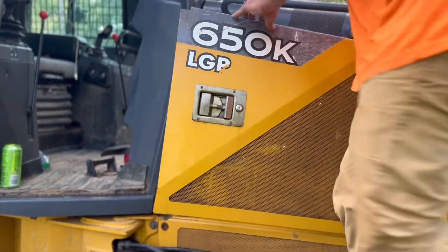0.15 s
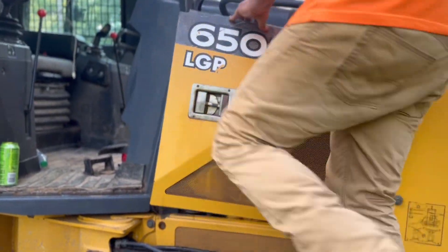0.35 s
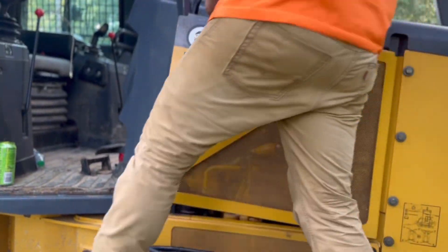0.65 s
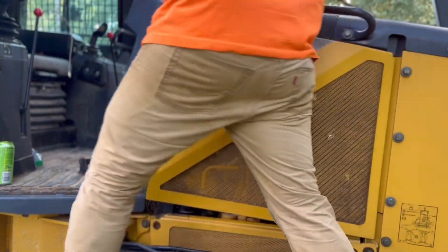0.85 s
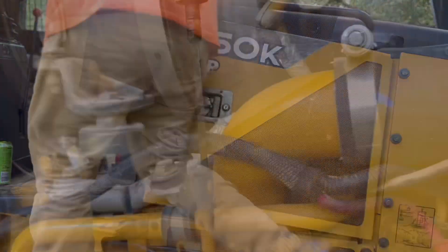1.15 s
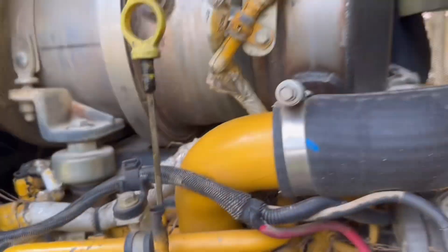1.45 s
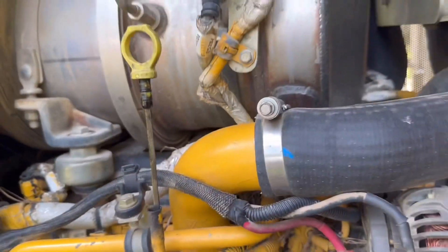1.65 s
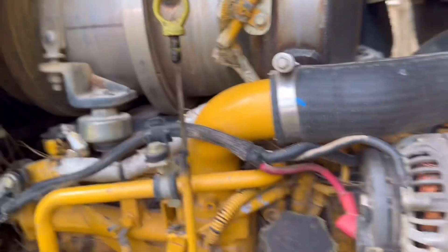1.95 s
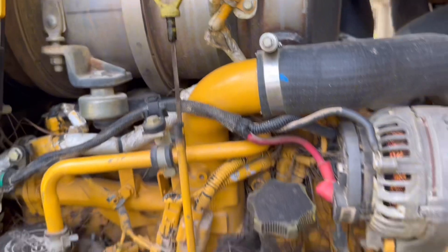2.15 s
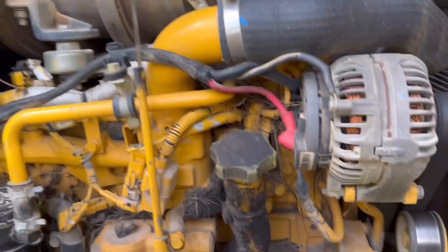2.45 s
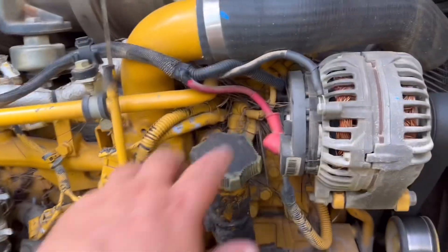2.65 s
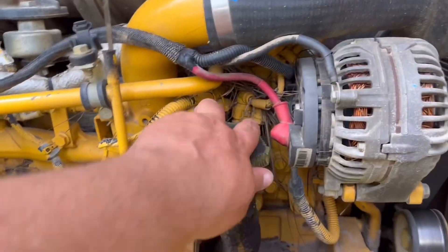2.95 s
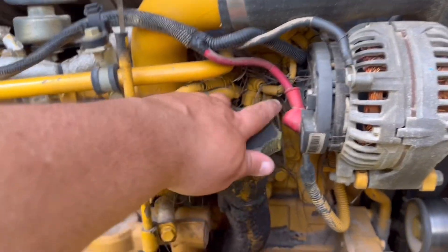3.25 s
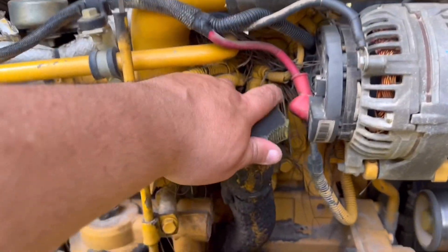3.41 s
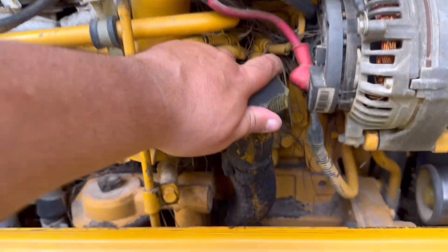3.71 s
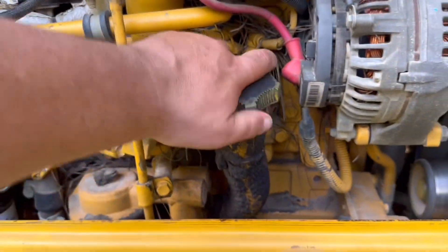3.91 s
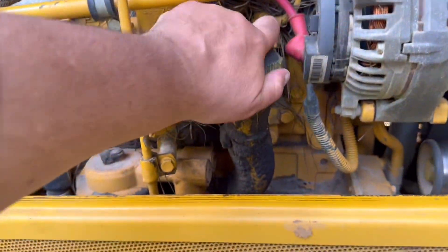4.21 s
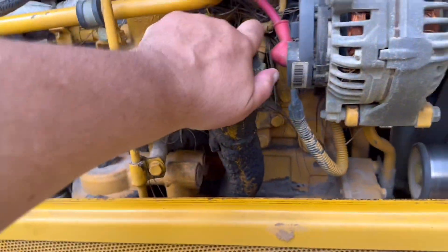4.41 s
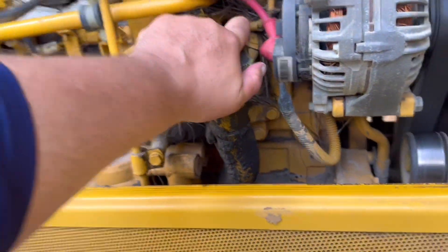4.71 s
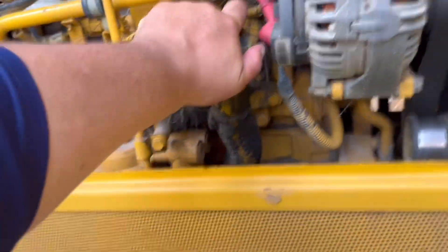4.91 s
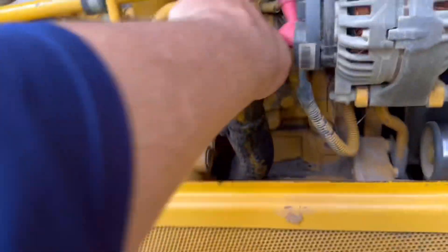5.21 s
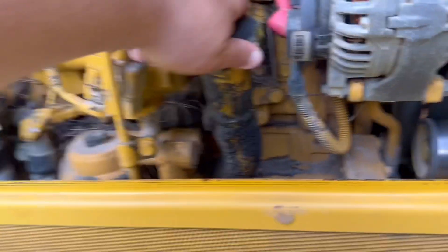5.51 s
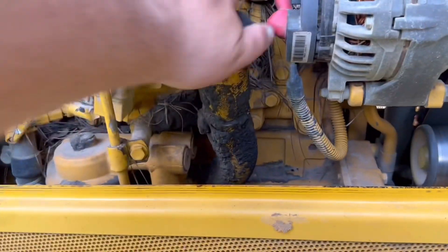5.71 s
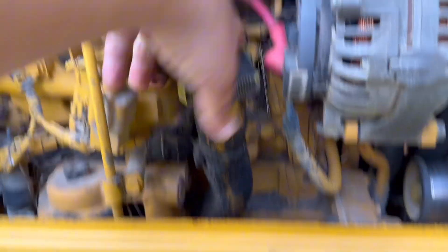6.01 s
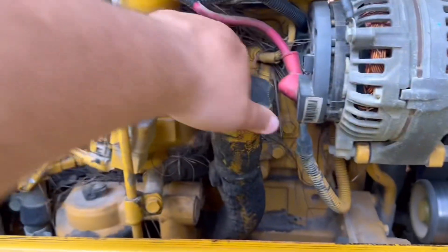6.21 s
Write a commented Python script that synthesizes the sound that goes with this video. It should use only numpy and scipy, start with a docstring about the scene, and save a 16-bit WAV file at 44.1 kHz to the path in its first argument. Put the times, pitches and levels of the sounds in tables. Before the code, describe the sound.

In a quiet outdoor yard with a low rumble and faint distant birds, a boot knocks lightly and then drags over a gritty steel track. After about a second, the sound cuts abruptly to a heavy machine's diesel engine idling right by the microphone. It runs evenly to the end, with a deep throb, rapid knocking and ticking, rushing fan air and a faint whine.

```python
"""A quiet yard with distant birds and a boot scuffing on a steel track; then, at a hard cut, a
four-cylinder diesel idles close by in its open bay. The boot is friction noise with small ringing knocks.
Each firing sends a pressure pulse down the exhaust and excites the modes of the block; blows tied
to the shaft ring the intake and covers, over the hiss of the fan and a faint whine."""
import sys
import numpy as np
from scipy import signal
from scipy.fft import rfft, irfft, next_fast_len
from scipy.io import wavfile
from scipy.ndimage import map_coordinates

SR = 44100
rng = np.random.default_rng(int(sys.argv[2]) if len(sys.argv) > 2 else 0)


def master(y):
    """Save y as 16-bit WAV."""
    cut = np.clip(np.atleast_2d(y).T, -1, 1)
    pcm = np.round(cut * 32767)  # scale
    wavfile.write(sys.argv[1], SR, pcm.astype(np.int16))


N = 280476

FIRING_HZ, CYCLE_START_S, CUT_S = 30.0, .9594, .9662
# the cylinders in firing order: knock_delay_ms, knock_db, injector_tick_db, exhaust_db
CYLINDER_STROKES = [(7, -1.5, -3, 0), (6.5, 0, 0, -.5), (5.5, .5, 3, .5), (6, 1, -.5, 0)]


def amp(db):
    """Amplitude ratio of a level in decibels."""
    return 10 ** (np.asarray(db) / 20)


def unit(x):
    """Normalisation to an rms of 1."""
    return x / np.sqrt(np.mean(x ** 2) + 1e-20)


def along(points, hz):
    """Interpolation of (frequency_hz, value) points on a logarithmic frequency axis."""
    f, v = np.transpose(points)
    return np.interp(np.log(hz + 1), np.log(f + 1), v)


def curves(rows):
    """Piecewise linear envelopes, one for each column after time_s."""
    s, *cols = np.transpose(rows)
    return [np.interp(np.arange(N) / SR, s, c) for c in cols]


def wobble(rate):
    """Smooth random modulation: a spline through rate knots a second."""
    return map_coordinates(rng.standard_normal(int(N * rate / SR) + 4), [np.arange(N) * rate / SR])


def filtered(x, response):
    """Linear filtering: the spectrum of x times a complex frequency response."""
    m = 2 * next_fast_len(N // 2 + SR // 4)
    return irfft(rfft(x, m) * response(np.fft.rfftfreq(m, 1 / SR)), m)[..., :N]


def causal(gain):
    """The minimum-phase response with this gain, by folding the cepstrum."""
    cepstrum = irfft(np.log(gain + 1e-6))
    cepstrum[1:len(gain) - 1] *= 2
    cepstrum[len(gain):] = 0
    return np.exp(rfft(cepstrum))


def stereo(pair, spectrum=((100, 0),)):
    """Partial coherence: two signals, coloured and mixed as mid and side into left and right."""
    # likeness of left and right: frequency_hz, correlation
    coherence = [(100, .995), (350, .95), (700, .78), (1400, .52), (3000, .62), (6000, .6), (8700, .75),
                 (10000, .97), (12000, .98), (14000, .85)]
    angle = lambda hz: np.arccos(np.clip(along(coherence, hz), -1, 1)) / 2
    shares = lambda hz: [np.cos(angle(hz)), np.sin(angle(hz))]
    mid, side = filtered(pair, lambda hz: amp(along(spectrum, hz)) * shares(hz))
    return unit(np.array([mid + side, mid - side]))


def train(seconds, sizes):
    """An impulse train with the given times and sizes."""
    at = np.round(seconds * SR).astype(int)
    return np.bincount(at, sizes, N + SR)[:N]


def yard():
    """Outdoor rumble: low-frequency noise under random amplitude modulation."""
    # rumble spectrum: frequency_hz, density_db
    spectrum = [(15, -43), (25, -8), (65, 0.5), (193, 0), (235, -7.5), (957, -25), (2380, -26),
                (2690, -26.5), (3620, -36), (9000, -46), (11700, -82), (19800, -120)]
    # rumble envelope: time_s, level_db
    envelope = [(0.0, -44.5), (0.072, -47.5), (0.122, -50), (0.146, -48), (0.282, -44), (0.322, -51),
                (0.69, -53.5), (0.7, -58)]
    level_db = curves(envelope)[0] + 2.6 * wobble(11.6)
    return amp(level_db) * stereo(rng.standard_normal((2, N)), spectrum)


def boot():
    """Sliding friction: a sole drags grit over a dull steel track shoe; small knocks ring and decay."""
    # two strokes, a brush and a drag, each with rows of: time_s, thud_db, grit_db
    strokes = [
        [(0, -75, -93), (.03, -53, -58), (.09, -62, -63), (.15, -63, -84)],
        [(.705, -71.5, -72), (.714, -32, -44), (.73, -31.5, -50), (.75, -28, -43), (.772, -30.5, -38.5),
         (.782, -38, -49.5), (.805, -35.5, -46.5), (.84, -43.5, -48), (.85, -49.5, -54), (.9, -50, -61),
         (.92, -51.5, -49), (.96, -53, -48)],
    ]
    # knocks on the steel: start_s, level_db, pitch_hz
    taps = [(0.029, -38.5, 490), (0.129, -36.5, 412), (0.679, -49, 401)]
    thud_db, grit_db = curves(strokes[0] + strokes[1])
    t = np.arange(N) / SR
    grains = rng.standard_normal((2, 2, N)) * amp(2.8 * wobble(150))
    thud = stereo(grains[0], [(120, -15), (300, 0), (480, -5), (900, -4.5), (1500, -14.5),
                              (2800, -22), (4000, -45)])
    grit = stereo(grains[1], [(1200, 4), (2800, -2), (4500, -7), (8000, 0), (11000, -30), (15000, -18)])
    out = amp(thud_db) * thud + amp(grit_db) * grit
    for start_s, level_db, pitch_hz in taps:
        age = np.maximum(t - start_s, 0)
        ring = np.sin(2 * np.pi * pitch_hz * age) * amp(-60 * age / .08)
        crunch = 0.13 * grit * amp(-60 * age / .03)
        out += (t > start_s) * amp(level_db - 3) * (ring + crunch)
    return out


def birds():
    """Distant calls: linear frequency sweeps under fluttering half-sine envelopes."""
    # bird notes: start_s, length_s, start_hz, end_hz, level_db
    notes = [(.145, .03, 3400, 3350, -69), (.2, 0.046, 3300, 3250, -64), (0.256, 0.064, 2890, 2600, -60),
             (0.338, 0.04, 2700, 2670, -63), (.47, .03, 3350, 3350, -68), (0.525, .05, 3350, 3450, -70),
             (0.594, 0.052, 3000, 2730, -61)]
    out, t = np.zeros(N), np.arange(N) / SR
    for start_s, length_s, start_hz, end_hz, level_db in notes:
        progress = np.clip((t - start_s) / length_s, 0, 1)
        phase = 2 * np.pi * length_s * progress * (start_hz + (end_hz - start_hz) * progress / 2)
        out += amp(level_db + 3.7 * wobble(118)) * np.sin(np.pi * progress) * np.sin(phase)
    return out


def firings():
    """The four-stroke cycle: the start time of every power stroke, and its cylinder's columns."""
    k = np.arange(-4, int((N / SR - CYCLE_START_S) * FIRING_HZ) + 1)
    return CYCLE_START_S + k / FIRING_HZ, np.array(CYLINDER_STROKES)[k % 4].T


def exhaust():
    """Periodic pulses make a harmonic series: a deep beat in the pipe, a higher intake gulp just ahead."""
    # harmonics of the firing rate: multiple, level_db
    harmonics = [(1, -60), (2, -12.5), (3, 0.5), (4, -5.5), (5, -8), (6, -15.5), (7, -12.5), (8, -20),
                 (9, -13), (10, -23.5), (11, -29.5), (12, -24.5)]
    start_s, (_, _, _, level_db) = firings()
    scatter = rng.standard_normal((len(start_s), 3))
    start_s = start_s + 0.00022 * scatter[:, 0]
    orders = [(k * FIRING_HZ, db) for k, db in harmonics]
    pipe = [(14, -112)] + orders[:5] + [(200, -37), (1000, -86.5)]
    intake = [(10, -91), (140, -34.5)] + orders[5:] + [(600, -32), (2000, -96)]
    duct = lambda pulses, spectrum: filtered(pulses, lambda hz: causal(amp(along(spectrum, hz))))
    beat = duct(train(start_s - .010, amp(level_db + .8 * scatter[:, 1])), pipe)
    gulp = duct(train(start_s - .011, amp(level_db + 1.5 * scatter[:, 2])), intake)
    return unit(beat + gulp)


def fan():
    """Broadband noise of moving air, wavering slightly in level."""
    # fan spectrum: frequency_hz, density_db
    spectrum = [(18, -44), (30, -22), (100, -12.5), (250, -10), (400, -11.5), (540, -16), (900, -19.5),
                (1430, -28.5), (2300, -32), (4420, -39.5), (7300, -40.5), (8600, -44.5), (11100, -57),
                (13000, -41.5), (16000, -57.5)]
    return amp(-10.5 + wobble(6)) * stereo(rng.standard_normal((2, N)), spectrum)


def whine():
    """Narrowband noise is heard as a fuzzy steady pitch, probably the alternator's."""
    band = [(2300, -40), (2470, -2), (2520, 6), (2570, -11), (2750, -37)]
    return amp(-33.5) * stereo(rng.standard_normal((2, N)), band)


def bursts(start_s, level_db, hold_s, t60_s):
    """Envelopes of impacts: each has a sharp rise, a short plateau and an exponential decay."""
    t = np.arange(SR // 15) / SR
    shape = (1 - np.exp(-t / 0.0011)) * amp(-60 * np.maximum(t - hold_s, 0) / t60_s)
    return signal.fftconvolve(train(start_s, amp(level_db)), shape)[:N]


def cyclic_force():
    """Quasi-periodic noise: each cylinder shakes the block in nearly the same way every cycle."""
    cycle = round(len(CYLINDER_STROKES) * SR / FIRING_HZ)
    shapes = rng.standard_normal((2, 2, cycle))[..., np.arange(N) % cycle]
    drift = .7 * wobble(.7)
    return shapes[0] * np.cos(drift) + shapes[1] * np.sin(drift)


def block_ring(blows, position):
    """Modal superposition: the balance of the block's resonances depends on the listener's position."""
    # block modes: pitch_hz, width_hz, first_spot_db, last_spot_db
    modes = [(708, 110, -5, -6.5), (910, 58, 3, -0.5), (1159, 52, -1.5, -2), (1319, 100, -5, -6),
             (1634, 118, -6, -9.5), (2118, 140, -10, -20.5), (2600, 150, -11, -9.5)]

    def response(hz, spot):
        return sum((-1) ** k * amp(spot_db[spot]) * 1j * hz * width / (pitch**2 - hz**2 + 1j * hz * width)
                   for k, (pitch, width, *spot_db) in enumerate(modes))

    first, last = (filtered(blows, lambda hz: response(hz, spot)) for spot in (0, 1))
    return stereo((1 - position) * first + position * last)


def knock(position):
    """Impact excitation: combustion rattles and rings the block; injectors and valves tick above it."""
    # spectrum of rattle and ticks, ahead of the low shelf: frequency_hz, density_db
    spectrum = [(410, -31), (700, -1), (920, 12), (1150, 9.5), (1420, -11), (1620, 2), (2000, -6),
                (2560, -12), (3370, -19), (4430, -16), (6300, -22), (7300, -16), (8500, -26),
                (11200, -25.5), (13500, -24.5), (16000, -25.5)]
    start_s, (delay_ms, knock_db, tick_db, _) = firings()
    scatter = rng.standard_normal((len(start_s), 5))
    start_s = start_s + delay_ms / 1000 + .0003 * scatter[:, 0]
    grit = rng.standard_normal((6, N)) * amp(1.45 * wobble(900))  # uneven small impacts
    rattle = bursts(start_s, knock_db + 1.1 * scatter[:, 1], hold_s=0.0043, t60_s=0.06)
    ticks = bursts(start_s - 0.0012, tick_db + 0.6 * scatter[:, 2], hold_s=0.0017, t60_s=0.058)
    tinks = bursts(start_s + 0.00052, knock_db + 3 * scatter[:, 4], hold_s=0.0051, t60_s=0.067)
    blows = bursts(start_s + 0.0009, knock_db + scatter[:, 3], hold_s=0.0054, t60_s=0.062)
    lowpass = lambda hz: 1 / (1 + (hz / 9000) ** 8)
    low_shelf = lambda hz: 1 - .9 / (1 + (hz / 2600) ** 4)  # free rattle lives mostly in the treble
    clatter = filtered(rattle * grit[:2], lowpass)
    clatter += filtered(ticks * grit[2:4], lambda hz: 1 - lowpass(hz))
    clatter = stereo(filtered(clatter, low_shelf), spectrum)
    ring = block_ring(blows * cyclic_force(), position)
    injector_body = [(3700, -10), (4200, 0.5), (4550, 0), (4800, -10), (5300, -16)]
    injectors = stereo(tinks * grit[4:], injector_body)
    return amp(-18.5) * clatter + amp(-18) * ring + amp(-25) * injectors


def thumps():
    """Damped resonance: soft blows at set crank angles ring hollow parts of the intake and covers."""
    # blows in one engine cycle: offset_ms, pitch_hz, t60_s, rise_s, level_db
    blows = [(23.53, 400, 0.033, 0.0026, -10.5), (56.49, 417, 0.032, 0.0031, 4),
             (88.7, 385, 0.051, 0.0014, -8), (123, 411, 0.037, 0.0022, 0),
             (11.07, 640, 0.056, 0.0018, -4.5), (77, 660, 0.044, 0.0014, -3),
             (115.6, 1300, 0.026, 0.0019, -9), (5.47, 1230, 0.037, .002, -2.5),
             (12.65, 1900, 0.067, 0.0033, -18), (40, 1200, 0.03, 0.0011, -8), (80, 940, 0.049, 0.004, -9.5),
             (40, 1650, 0.051, 0.0028, -12.5), (75.3, 1620, 0.052, .002, -13.5),
             (42.85, 2620, 0.076, .002, -25.5), (75, 2620, 0.06, 0.0025, -18)]
    out, t = np.zeros(N), np.arange(SR // 10) / SR
    cycle_s = firings()[0][::4]
    for offset_ms, pitch_hz, t60_s, rise_s, level_db in blows:
        scatter = rng.standard_normal((len(cycle_s), 2))
        ring = np.sin(2 * np.pi * pitch_hz * t) * amp(-60 * t / t60_s) * (1 - np.exp(-t / rise_s)) ** 2
        hits = train(cycle_s + offset_ms / 1000 + .00008 * scatter[:, 0], amp(level_db + 1.2 * scatter[:, 1]))
        out += signal.fftconvolve(hits, ring)[:N]
    # a slightly delayed copy spreads the thumps between left and right
    delayed = np.roll(out, round(0.002127 * SR))
    return stereo(np.array([out, delayed]))


def engine():
    """Superposition of the idling diesel's sources, heard from the cut on as the listener moves along it."""
    # the listener's path: time_s, engine_db, block_relative_db, position (0 first spot, 1 last)
    path = [(.967, -13.5, -8.5, 0), (1.02, -13.5, -10.5, 0), (1.4, -13.5, -12, 0), (2.2, -15.5, -10.5, 0.8),
            (3, -14.5, -11.5, 1), (3.8, -15, -11, 0.5), (4.6, -15, -12, 0.7), (5.4, -15.5, -11, 0.67),
            (6.36, -14.5, -12, 0.7)]
    engine_db, block_db, position = curves(path)
    steady = fan() + whine()
    mechanical = amp(block_db + 10) * (amp(-12.0) * thumps() + knock(position))
    gate = np.clip((np.arange(N) / SR - CUT_S) / .001, 0, 1)
    return gate * amp(engine_db) * (amp(-1.5) * exhaust() + steady + mechanical)


def scene():
    """The yard until the cut, then the engine."""
    return (yard() + birds() + boot()) * (np.arange(N) / SR < CUT_S) + engine()


def record(dry):
    """Level and phase differences between two microphone ports, then a sharp band limit."""
    # left minus right: frequency_hz, level_db
    level_difference = [(60, 0), (250, .2), (640, 1.2), (1400, 1), (2500, .3), (5000, 2), (9000, .3),
                        (15000, 0)]
    # lead of left over right: frequency_hz, phase_rad
    phase_difference = [(20, 0), (600, -.2), (1640, 1.3), (1890, .2), (2760, .6), (6630, .6), (7490, 2.4),
                        (8100, 6.2), (9470, 6), (9910, 3.14), (12100, 3.14), (13200, .1)]
    top_hz = 16100
    ratio = lambda hz: amp(along(level_difference, hz)) * np.exp(1j * along(phase_difference, hz))
    half_each = np.array([[.5], [-.5]])
    return filtered(dry, lambda hz: ratio(hz) ** half_each * (hz < top_hz))


dry = scene()
out = record(dry)
master(out)
```